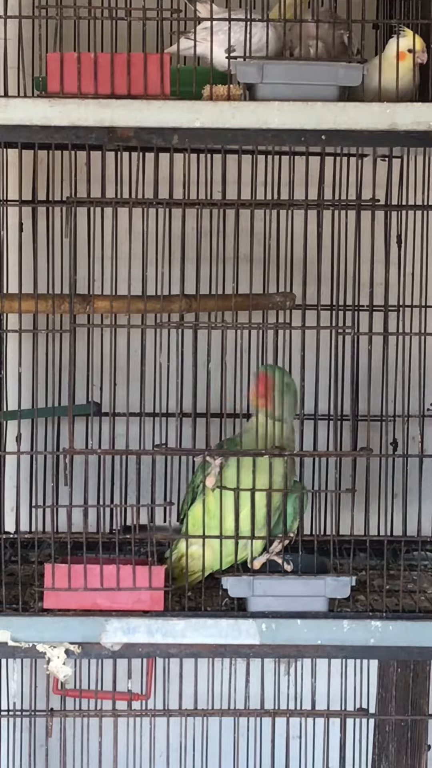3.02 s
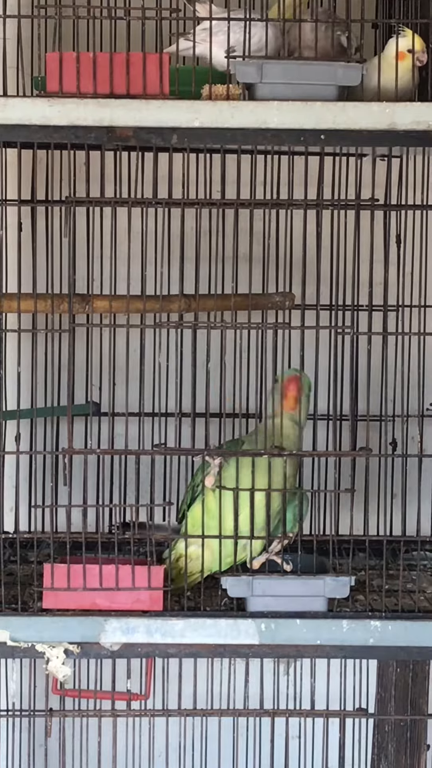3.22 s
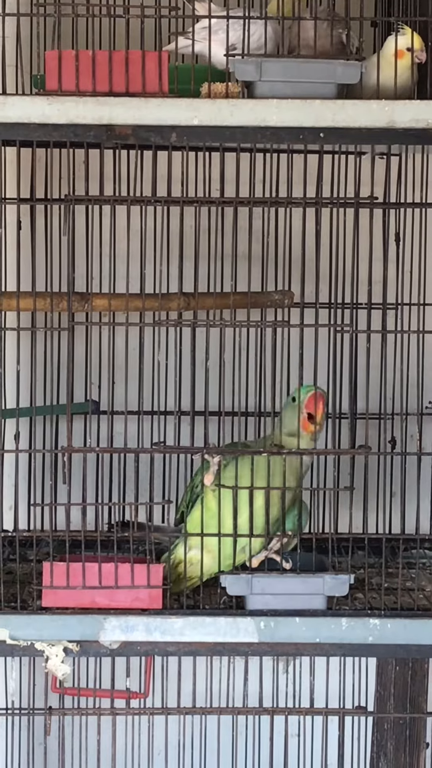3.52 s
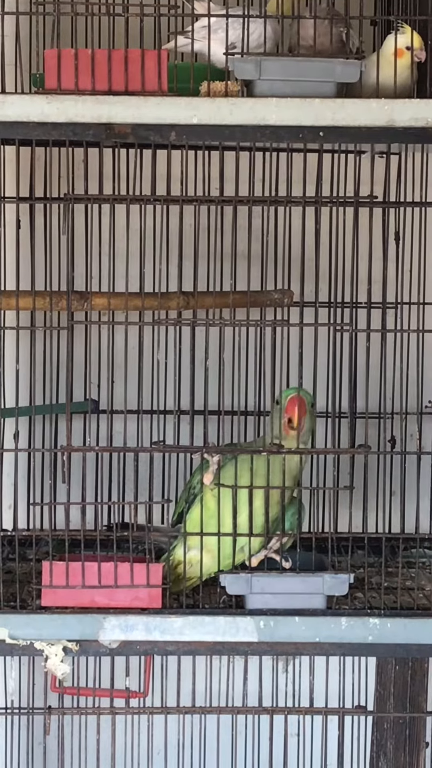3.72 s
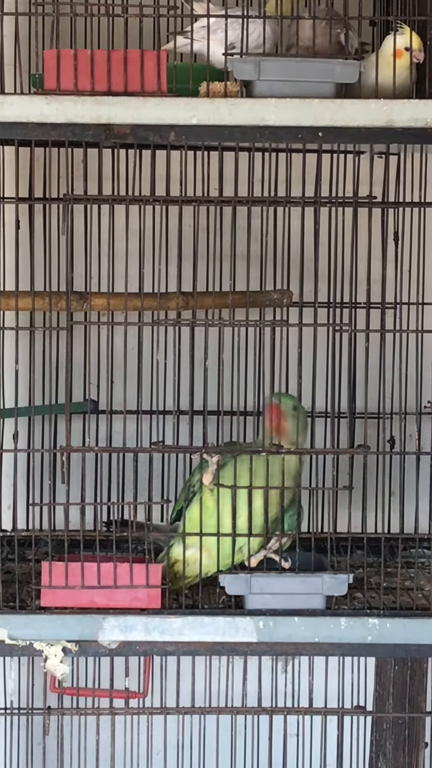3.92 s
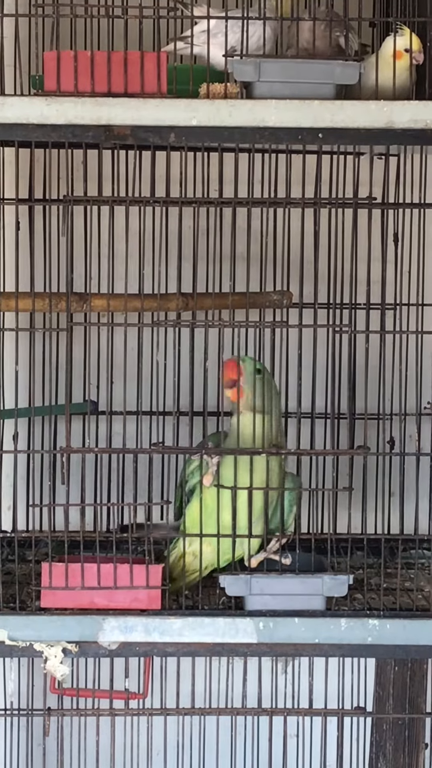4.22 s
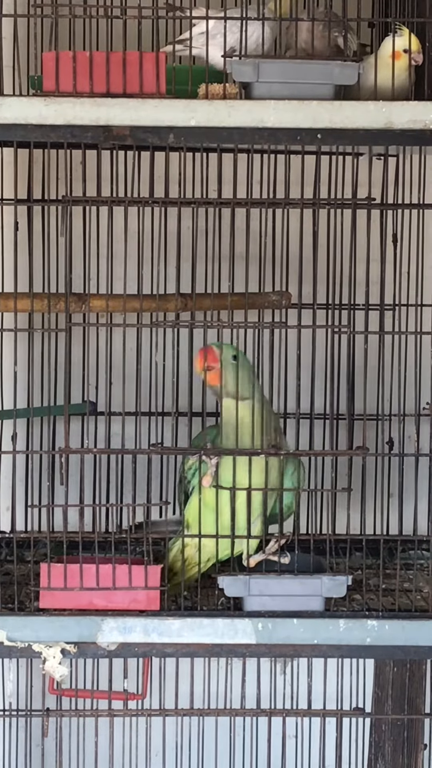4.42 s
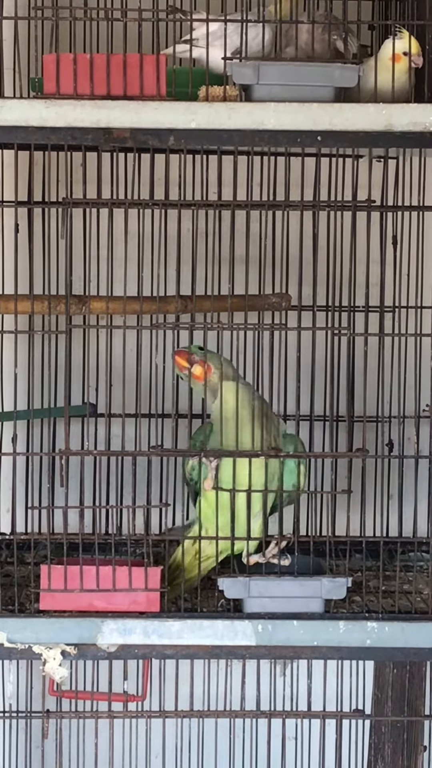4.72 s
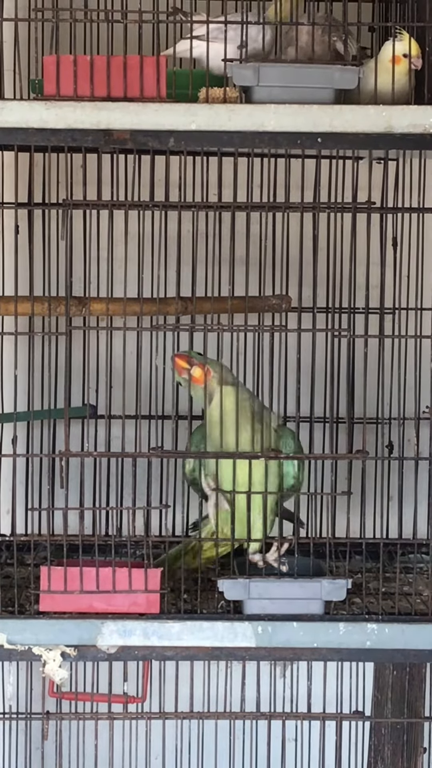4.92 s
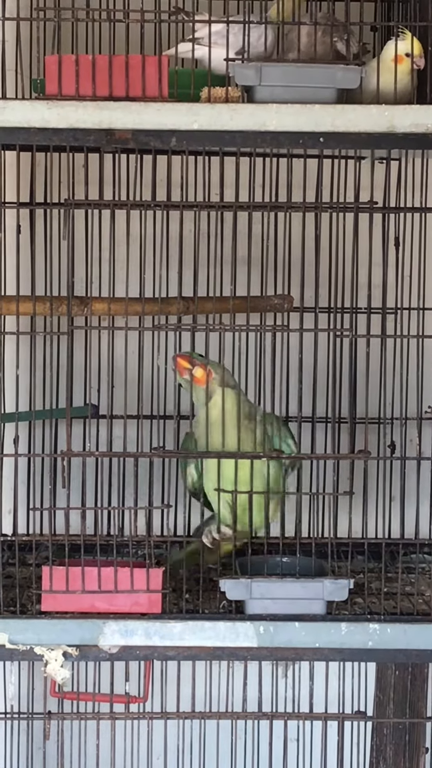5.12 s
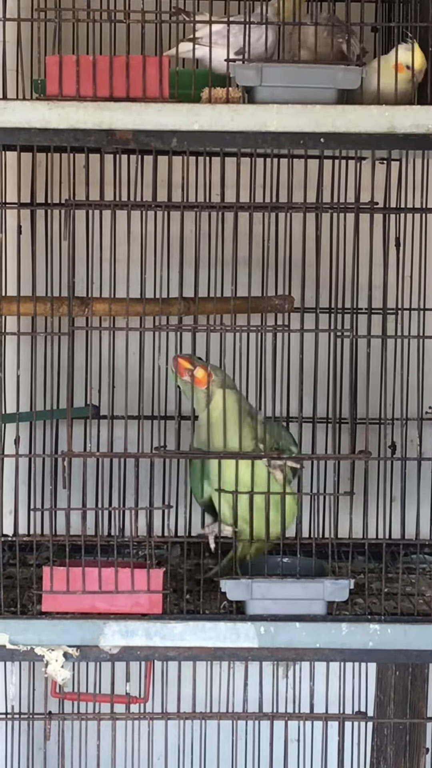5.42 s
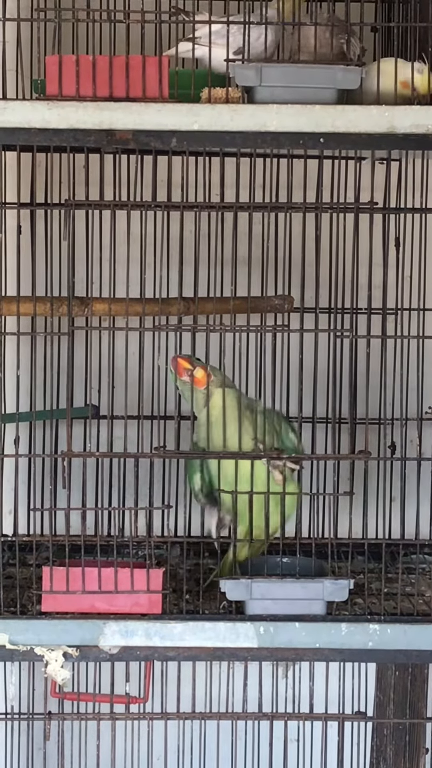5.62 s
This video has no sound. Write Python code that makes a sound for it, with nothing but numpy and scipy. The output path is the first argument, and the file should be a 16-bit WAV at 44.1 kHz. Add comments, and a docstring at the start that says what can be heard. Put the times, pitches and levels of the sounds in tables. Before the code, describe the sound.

Caged birds chirp in scattered bursts while one big bird squawks harshly four times, with shrill leaping cries and a soft low fan rush.

```python
"""Caged parakeets in a small hard-walled bird room, a fan humming and rushing beneath them throughout.
Claws tick first, as shaped noise; chirps glide by, then a grainy rasp. From 0.63 s a big bird squawks four
times, rough and arched in pitch as its effort rises and sags. Shrieks leap register from 0.94 s, and thin
whistles drift from 2.3 s. A low thud of noise follows at 2.9 s, and a scalloped trill climbs at 4.2 s."""
import sys
import numpy as np
from scipy import signal
from scipy.fft import rfft, irfft, next_fast_len
from scipy.io import wavfile
from scipy.ndimage import map_coordinates

SR = 44100
rng = np.random.default_rng(int(sys.argv[2]) if len(sys.argv) > 2 else 0)


def transcribe(signal):
    """Save signal, clipped to [-1, 1], as a 16-bit WAV file at the path in sys.argv[1]."""
    frames = np.atleast_2d(signal).T
    limited = np.clip(frames, -1, 1)
    pcm = np.round(limited * 32767).astype(np.int16)
    wavfile.write(sys.argv[1], SR, pcm)


N = 254898
TIME = np.arange(N) / SR

# spectrum of the fan's rush of air: f/Hz, level/dB
AIR_COLOUR = [(25, -50), (38, -21), (52, -1.5), (91, -3.5), (160, -9.5), (235, -5.5), (300, -9.5),
              (414, -9), (700, -15), (2000, -18.5), (3500, -19), (6500, -25.5), (15800, -34.5)]
HUM_HZ, HUM_DB = 77.2, -50
# claws on the cage wire: t/s, strike level/dB before the claws' trim
CLAW_TICKS = [(0.0127, -37), (1.535, -40), (1.778, -50), (1.8377, -38), (1.875, -38), (2.329, -41),
              (5.5213, -45), (5.559, -36.5)]
# spectrum of a tick: f/Hz, level/dB
TICK_COLOUR = [(800, 7), (3000, 14.5), (8000, 8.0), (15000, 6.5)]
# short notes: start t/s, length t/s, first f/Hz, middle f/Hz, last f/Hz, level/dB before the chirps' trim,
# overtone slope/(dB per octave), roughness/1
CHIRPS = [ (.087, 0.017, 5040, 4445, 4330, -39, -6, 0.65), (0.109, 0.03, 4235, 3940, 2800, -35.5, -1, 0.65),
          (.223, 0.019, 3190, 2985, 3050, -28.5, -1, 0.33),
          (0.236, 0.026, 3480, 3906, 3730, -28.5, -0.5, 0.3),
          (0.293, 0.034, 3150, 3000, 3600, -32, -14, 0.4), (0.333, .022, 4130, 4560, 4750, -35, -9, 0.42),
          (0.394, 0.045, 5870, 6120, 5880, -30.5, -27, 0.72),
          (0.4, .06, 1738, 1884, 1980, -37.5, -11.5, 1.12),
          (0.459, 0.14, 2500, 2440, 2430, -34.5, -24, .76),
          (0.554, 0.035, 3330, 4100, 3810, -23.5, -0.5, 1.02),
          (0.815, 0.059, 3700, 4330, 4150, -21.5, -5, 1.23),
          (0.956, 0.097, 2823, 2350, 2160, -28, -8, 1.05), (1.22, 0.017, 2600, 2755, 2730, -10, -10, 0.52),
          (1.565, 0.033, 3700, 5250, 5070, -39.5, -25, 0.82),
          (1.577, 0.033, 3100, 2724, 3450, -33, -22, 0.5),
          (1.604, 0.033, 3750, 4190, 4830, -28.5, -13, 0.35),
          (1.951, 0.012, 2150, 2310, 2390, -33, -1, 0.56), (1.964, 0.076, 2760, 2730, 2476, -40, -6, 0.09),
          (2.039, 0.0081, 4550, 4650, 4600, -13.5, 0, 0.24),
          (2.08, .08, 3400, 3970, 4570, -28.5, -2.5, 0.48), (2.098, .13, 1594, 1895, 2280, -32.5, -8, 0.25),
          (2.552, .033, 3190, 3410, 2830, -37, 1.5, 0.09), (2.579, 0.1, 2250, 2168, 1990, -36.5, -9.5, 1),
          (2.645, 0.017, 5180, 4400, 4100, -36.5, -2, 0.88),
          (2.786, 0.016, 4270, 4540, 4270, -38.5, 2, 0.9),
          (2.79, 0.033, 5870, 5935, 5860, -32.5, -23, 0.26),
          (2.864, 0.021, 5200, 4456, 3770, -34.5, -4.5, 0.94), (3.001, .03, 4140, 3920, 4200, -25, -6, 0.5),
          (3.04, 0.048, 1515, 1584, 1770, -34.5, -14.5, 0.37),
          (3.044, 0.031, 3790, 3640, 3700, -19.5, -1.5, 0.23),
          (3.076, .06, 1950, 2414, 2870, -26.5, -30, 0.34),
          (3.133, 0.112, 2750, 2920, 2890, -30, -29, 0.31),
          (3.088, .17, 2000, 2307, 2400, -34.5, -35, 0.93), (3.28, .08, 1329, 1600, 2113, -29, -12.5, 0.44),
          (3.283, 0.054, 4770, 3535, 3190, -33, -0.5, 0.76),
          (3.343, 0.025, 3470, 4100, 3730, -26, -1, 0.83),
          (3.73, 0.14, 1940, 1834, 1535, -38.5, -15.5, 0.94),
          (4.314, 0.046, 2480, 2995, 2250, -17.5, -15.5, 0.21),
          (4.32, 0.18, 2150, 2358, 2137, -23.5, -20, 0.6), (4.362, .032, 2450, 2102, 1986, -19, -8, 0.07),
          (4.396, .045, 2173, 2766, 1995, -16.5, -14, 0.03), (4.418, 0.07, 2695, 2767, 2678, -14, -40, 0.2),
          (4.487, 0.025, 4550, 4420, 4220, -21.5, -4.5, 0.57),
          (4.511, .07, 3740, 3550, 4144, -16, -4.5, 0.49),
          (4.588, 0.036, 2730, 2780, 2680, -25, -1.5, 0.41), (4.599, 0.071, 3800, 3670, 3700, -27, -4, .43),
          (4.828, .026, 2100, 2333, 3140, -21, 3.5, 0.61), (4.845, .04, 3705, 4526, 4690, -22, -9, .9)]
CHIRP_TAPER_DB = 2  # a note is this much softer at its ends than in its middle
# envelope of a toneless scolding hiss: t/s, treble level/dB before the rasp's trim
RASP_ENVELOPE = [(0.385, -44.5), (0.457, -42.5), (0.465, -35.5), (0.541, -42), (0.575, -34), (0.623, -39.5),
                 (0.64, -30)]
# spectrum of the hiss: f/Hz, level/dB
RASP_COLOUR = [(590, -58), (1000, -22), (1500, -12), (1930, -24), (2270, 1), (2610, 8), (3600, 0),
               (3950, -2), (4650, 2), (6060, 3.5), (10100, -13), (12000, -6.5), (15800, -24)]
# the big bird's squawks: start t/s, length t/s, rise t/s, hold ends t/s after start, full-effort f/Hz,
# level/dB, opening level/dB relative to it, roughness at full effort/1
SQUAWKS = [ (.63, .30, .042, 0.14, 1861, -13.5, -8.5, 0.79),
           (1.204, 0.22, .028, .10, 1767, -15, -1.5, 0.61),
           (3.37, 0.27, .034, .11, 1858, -12.5, -6.5, 0.77),
           (3.948, 0.25, .036, .095, 1799, -13.5, -5.5, 0.61)]
SLACK_HZ, ROUGH_SLACK = 1228, 0.27  # pitch and roughness with no effort
SAG_S, FADE_DB_PER_S = .07, 66  # time for the effort to halve after the hold; fade after the hold
# shrill calls whose syrinx also swings at half the pitch: start t/s, length t/s, leap t/s after start,
# stay high t/s, low f/Hz, high f/Hz, level/dB, overtone slope/(dB per octave), undertone level/dB, roughness/1
SHRIEKS = [ (0.938, 0.056, 0.017, .036, 4280, 6295, -13.5, -7.5, -15, .3),
           (2.974, 0.086, .016, .006, 4610, 6090, -24.5, -2.5, -2, 0.5),
           (3.937, .058, .023, 0.013, 5080, 6360, -14.5, -3, -18.5, 0.48),
           (4.839, 0.049, .022, .04, 5260, 6394, -12, -8.5, -30, 0.41)]
SCOOP, SCOOP_S, LEAP_S = .2, .009, .002  # share flat at the start; settling and leaping time constants
# thin, distant whistles: start t/s, length t/s, first f/Hz, last f/Hz, level/dB
WHISTLES = [(2.31, 0.24, 3940, 3590, -47.5), (4.681, 0.2, 3650, 3630, -43.5), (4.944, .35, 3150, 2964, -57),
            (5.362, 0.46, 3970, 4214, -50.5)]
# spectrum of the soft thud: f/Hz, level/dB
THUD_COLOUR = [(80, -25), (220, 0), (320, -2), (600, -16), (2000, -40)]
TRILL_START_S, TRILL_LENGTH_S = 4.196, .118
TRILL_FIRST_HZ, TRILL_LAST_HZ = 1584, 2463
TRILL_DB, TRILL_GROWS_DB = -26.5, 8.5  # level at the start; gain by the end
# throat and beak resonances of the big bird: f/Hz, level/dB
BIG_THROAT = [(900, 1), (1350, -12), (1850, -10.5), (2300, -1.5), (2700, 1.5), (3250, 2), (3750, -8.5),
              (4300, -1), (4850, -15.5), (5500, -11), (6100, -8.5), (6800, -9.5), (8100, -30),
              (9300, -20.5), (10600, -43.5), (13300, -21.5), (16000, -35)]
# throat and beak resonances of the smaller birds: f/Hz, level/dB
SMALL_THROAT = [(1400, -8.5), (2200, 5), (3800, 10.5), (6200, 3.5), (8000, 2.5), (10500, -2.5), (12800, 4),
                (16000, -10.5)]
# reverberation of the room: f/Hz, time to fall 60 dB t/s
ROOM_DECAY = [(1000, 0.55), (2600, 0.39), (7000, 0.3), (14000, 0.27)]
TOP_HZ = 15830  # band limit of the recorder


def amp(db):
    """Decibels to gain."""
    return 10 ** (np.asarray(db) / 20)


def unit(x):
    """Scaled to rms 1."""
    return x / np.sqrt(np.mean(x ** 2) + 1e-20)


def along(points, hz):
    """(Hz, value) points read on a log frequency axis."""
    f, v = np.transpose(points)
    return np.interp(np.log(hz + 1), np.log(f + 1), v)


def wobble(rate, size):
    """A smooth random curve, rate knots a second."""
    knots = rng.standard_normal(4096)
    return map_coordinates(knots, [np.arange(size) * rate / SR], mode="wrap")


def filtered(x, response):
    """x shaped by a response of frequency."""
    m = next_fast_len(len(x) + 8192)
    spectrum = rfft(x, m) * response(np.fft.rfftfreq(m, 1 / SR))
    return irfft(spectrum, m)[:len(x)]


def noise(colour, band):
    """Coloured noise whose rms inside the band is 1."""
    x = filtered(rng.standard_normal(N), lambda hz: amp(along(colour, hz)))
    return x / np.std(filtered(x, lambda hz: (hz > band[0]) & (hz < band[1])))


def add(track, s, x):
    """Mix x into the track from time s."""
    part = track[max(0, round(s * SR)):][:len(x)]
    part += x[:len(part)]


def clock(length):
    """Seconds since the start of a call, per sample."""
    return np.arange(max(int(length * SR), 256)) / SR


def contour(rows):
    """Each column after the time, per sample, over the length of one call."""
    s, *cols = np.transpose(rows)
    t = s[0] + clock(s[-1] - s[0])
    return [np.interp(t, s, c) for c in cols]


def room(x, wet_db, early_db, early_t60=0.061):
    """Direct sound, dense early echoes off trays and walls, and a tail; each call draws its own echoes."""
    hz, t, z = signal.stft(rng.standard_normal(SR // 2), SR, nperseg=256)
    decay = amp(-60 * t / along(ROOM_DECAY, hz)[:, None])
    tail = signal.istft(z * decay, SR, nperseg=256)[1]
    t = np.arange(len(tail)) / SR
    # cubing makes the early echoes spiky
    early = rng.standard_normal(len(t)) ** 3 * amp(-60 * t / early_t60) * (t > .002)
    tail = tail * (1 - np.exp(-t / 0.0087))
    echo = amp(wet_db) * tail / np.linalg.norm(tail) + amp(early_db) * early / np.linalg.norm(early)
    echo[0] += 1  # direct sound
    return signal.fftconvolve(x, echo / np.linalg.norm(echo))


def syrinx(pitch, db, throat, slope_db, undertone_db, turbulence, count):
    """Gliding harmonics, lines halfway between and pulsed turbulence, shaped by throat and beak."""
    k = np.arange(1, 2 * count + 1)[:, None] / 2
    phase = 2 * np.pi * np.cumsum(pitch) / SR
    overtone_db = slope_db * np.log2(np.maximum(k, 1))
    gains = amp(along(throat, k * pitch) + overtone_db + undertone_db * (k % 1 > 0))
    gains = gains * (k * pitch < SR / 2)
    wave = (gains * np.sin(k * phase)).sum(0) / np.sqrt((gains ** 2).sum(0) / 2)
    # before the throat, turbulence is strongest at the call's lowest pitch; it pulses once a cycle
    low_hz = pitch.min()
    band = [(low_hz / 2, -30), (low_hz, 0), (2 * low_hz, -2), (16000, -12)]
    pulses = rng.standard_normal(len(pitch)) * (1 + np.sin(phase))
    air = filtered(pulses, lambda hz: amp(along(throat, hz) + along(band, hz)))
    t = np.arange(len(pitch)) / SR
    fade = np.clip(np.minimum(t, t[-1] - t) / .0035, 0, 1)
    return (wave + turbulence * unit(air)) * amp(db) * fade


def small_call(pitch, db, slope_db, rough, undertone_db,
               quaver=0.0668, jitter=0.052, flutter_db=4.5, turbulence=0.37):
    """One call of a smaller bird: roughness scales quaver, flutter and turbulence, with room echo."""
    n = len(pitch)
    pitch = pitch * np.exp(rough * (quaver * wobble(235.85, n) + jitter * wobble(2200, n)))
    db = db + flutter_db * rough * wobble(177.0, n)
    call = syrinx(pitch, db, SMALL_THROAT, slope_db, undertone_db, turbulence * rough, count=8)
    return room(call, wet_db=-0.5, early_db=-1.5)


def fan(rush_db=-52, waver_db=-1.5, drift_db=-0.13):
    """A low wavering sine hum over a soft, slowly drifting rush of air."""
    air = noise(AIR_COLOUR, (150, 900))
    hum_gain = amp(HUM_DB + waver_db * wobble(11, N))
    hum = np.sqrt(2) * np.sin(2 * np.pi * HUM_HZ * TIME) * hum_gain
    return hum + air * amp(rush_db + drift_db * wobble(1.82, N))


def claws(level_db=-3, t60=0.086):
    """Short bright ticks on the cage wire, each a decaying burst of noise."""
    out, t = np.zeros(N), np.arange(SR // 20) / SR
    for s, db in CLAW_TICKS:
        burst = rng.standard_normal(len(t))
        tick = unit(filtered(burst, lambda hz: amp(along(TICK_COLOUR, hz))))
        add(out, s, room(tick * amp(db + level_db - 60 * t / t60), wet_db=-3.0, early_db=-23))
    return out


def chirps(chirp_db=-0.6):
    """Each note is one bent glide that swells and fades."""
    out = np.zeros(N)
    for start, length, first_hz, middle_hz, last_hz, db, slope_db, rough in CHIRPS:
        u = np.linspace(-1, 1, len(clock(length)))
        bend = np.polyfit([-1, 0, 1], [first_hz, middle_hz, last_hz], 2)
        swell = db + chirp_db - CHIRP_TAPER_DB * u ** 2
        add(out, start, small_call(np.polyval(bend, u), swell, slope_db, rough, undertone_db=-32.5))
    return out


def rasp(level_db=-1):
    """A harsh call with no pitch: grainy noise through the open beak."""
    db, = contour(RASP_ENVELOPE)
    n = len(db)
    hiss = noise(RASP_COLOUR, (8000, 15000))[:n]
    grain = unit(amp(3.5 * wobble(240, n)))
    out = np.zeros(N)
    add(out, RASP_ENVELOPE[0][0], room(hiss * grain * amp(db + level_db), wet_db=-3, early_db=-3))
    return out


def squawks(flutter_db=6.0, warble=0.1287, warble_hz=60):
    """Effort drives pitch and roughness; pushed hard, the membranes lurch in pitch and strength."""
    jitter, turbulence = .016, .08
    out = np.zeros(N)
    for start, length, rise, hold, top_hz, level_db, opening_db, top_rough in SQUAWKS:
        t = clock(length)
        n = len(t)
        push, spent = np.minimum(t / rise, 1), np.maximum(t - hold, 0)
        effort = push / (1 + (spent / SAG_S) ** 2)
        rough = ROUGH_SLACK + (top_rough - ROUGH_SLACK) * effort
        warble_rate = warble_hz * (1 + .35 * wobble(90, n))
        lurch = np.sin(2 * np.pi * np.cumsum(warble_rate) / SR) + 0.431 * wobble(300, n)
        bend = np.exp(rough * (warble * lurch + jitter * wobble(1500, n)))
        pitch = (SLACK_HZ + (top_hz - SLACK_HZ) * effort) * bend
        db = level_db + opening_db * (1 - push) - FADE_DB_PER_S * spent
        db = db + flutter_db * rough * wobble(216.2, n)
        call = syrinx(pitch, db, BIG_THROAT, slope_db=-3.5, undertone_db=-63,
                      turbulence=turbulence * rough, count=12)
        add(out, start, room(call, wet_db=0.0, early_db=3.5))
    return out


def shrieks(attack_s=0.013, opening_db=-14, fade_db_per_s=70):
    """The voice scoops up to its low register and leaps to the high one; all but the last drop back."""
    out = np.zeros(N)
    for start, length, leap, stay, low_hz, high_hz, db, slope_db, undertone_db, rough in SHRIEKS:
        t = clock(length)
        high = (np.tanh((t - leap) / LEAP_S) - np.tanh((t - leap - stay) / LEAP_S)) / 2
        pitch = (low_hz + (high_hz - low_hz) * high) * (1 - SCOOP * np.exp(-t / SCOOP_S))
        attack_db = opening_db * np.maximum(1 - t / attack_s, 0)
        swell = db + attack_db - fade_db_per_s * np.maximum(t - attack_s, 0)
        add(out, start, small_call(pitch, swell, slope_db, rough, undertone_db))
    return out


def whistles(taper_db=5):
    """Long, nearly pure notes that drift in pitch."""
    out = np.zeros(N)
    for start, length, first_hz, last_hz, db in WHISTLES:
        n = len(clock(length))
        pitch = np.linspace(first_hz, last_hz, n)
        swell = db - taper_db * np.linspace(-1, 1, n) ** 2
        add(out, start, small_call(pitch, swell, slope_db=-15, rough=0.286, undertone_db=-42))
    return out


def shuffle(s=2.88, length=0.19, level_db=-53):
    """A soft low thud as a bird shifts its weight: dull noise under a bell-shaped swell."""
    body = noise(THUD_COLOUR, (100, 600))
    return body * amp(level_db) * np.exp(-(2 * (TIME - s) / length) ** 2)


def trill(scallop_hz=48, depth=0.08, pulse_db=6):
    """A climbing, swelling call; each little push of air arches the pitch and lifts the level."""
    t = clock(TRILL_LENGTH_S)
    u = t / t[-1]
    arch = np.abs(np.sin(np.pi * scallop_hz * t)) - 2 / np.pi  # centred on zero
    pitch = TRILL_FIRST_HZ * (TRILL_LAST_HZ / TRILL_FIRST_HZ) ** u * (1 + depth * arch)
    swell = TRILL_DB + TRILL_GROWS_DB * u + pulse_db * arch
    out = np.zeros(N)
    add(out, TRILL_START_S, small_call(pitch, swell, slope_db=-8.5, rough=0.11, undertone_db=-30))
    return out


def scene():
    """All birds and the fan at one microphone."""
    mix = fan() + claws() + chirps() + rasp() + squawks()
    mix = mix + shrieks() + whistles() + shuffle() + trill()
    return mix[None]


def record(dry, threshold_db=-27, squeeze=0.19, follow_s=0.035):
    """Gentle gain control turns loud calls down; the recorder keeps nothing above its band limit."""
    keep = np.exp(-1 / (follow_s * SR))
    power = signal.lfilter([1 - keep], [1, -keep], dry[0] ** 2)
    gain = (1 + power / amp(threshold_db) ** 2) ** (-squeeze / 2)
    return filtered(dry[0] * gain, lambda hz: hz < TOP_HZ)[None]


dry = scene()
out = record(dry)
transcribe(out)
```